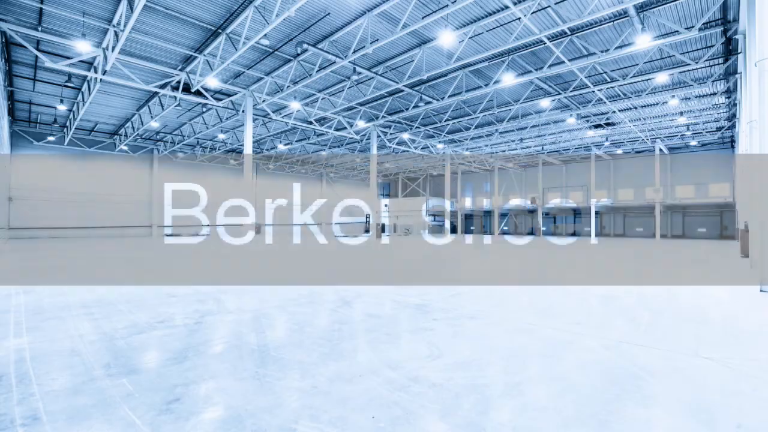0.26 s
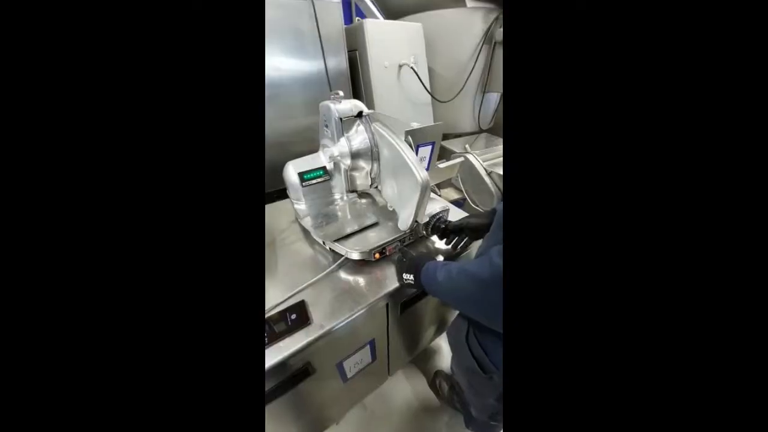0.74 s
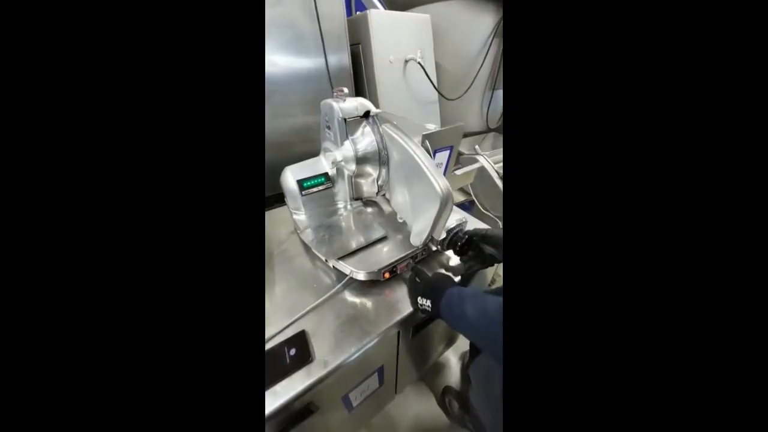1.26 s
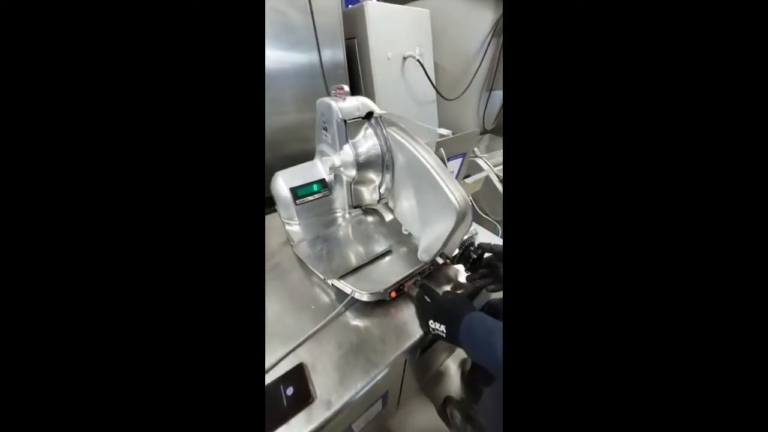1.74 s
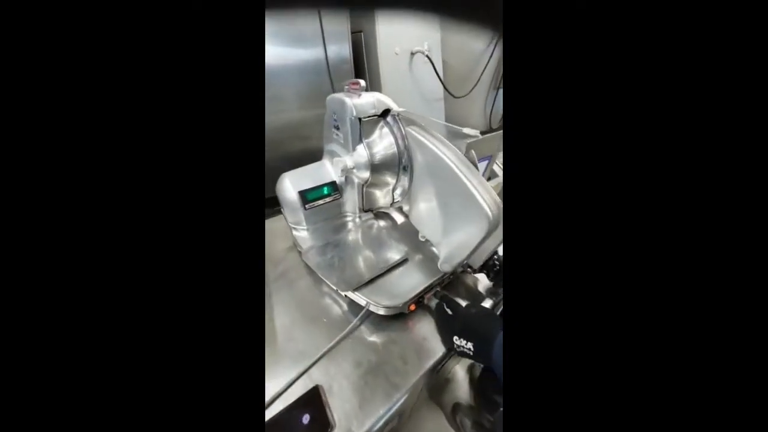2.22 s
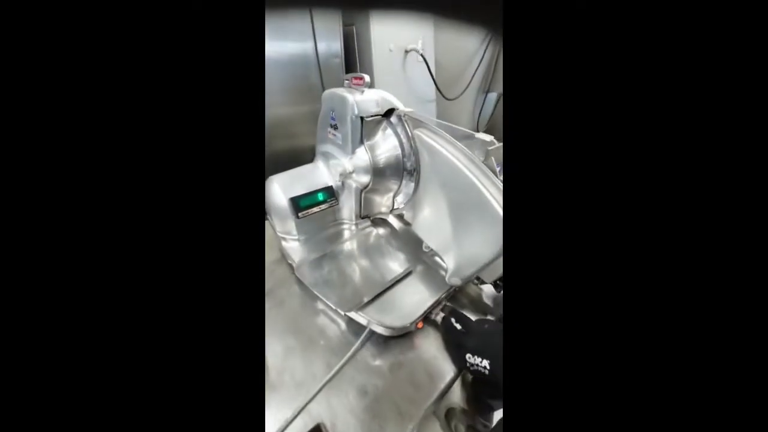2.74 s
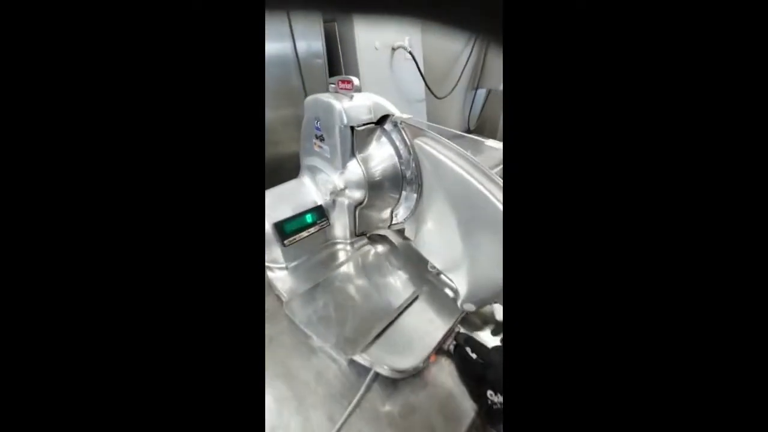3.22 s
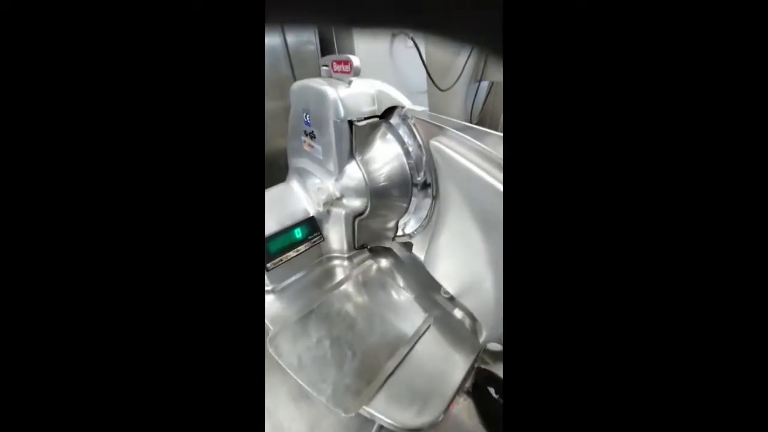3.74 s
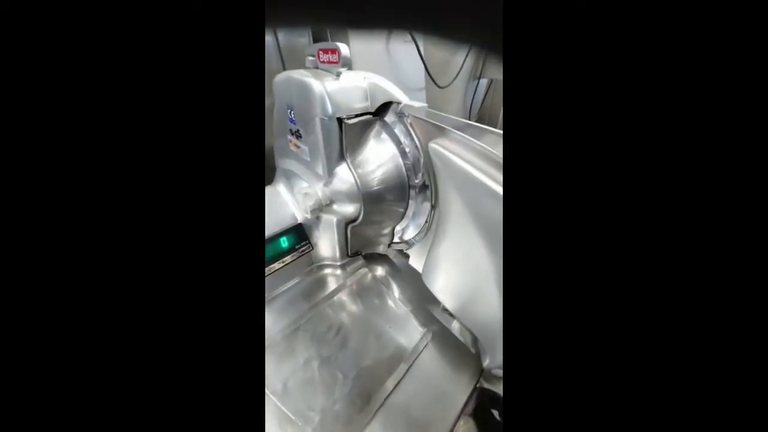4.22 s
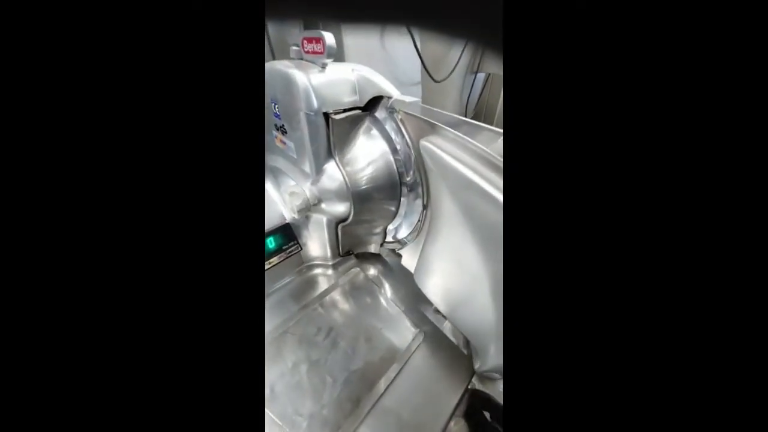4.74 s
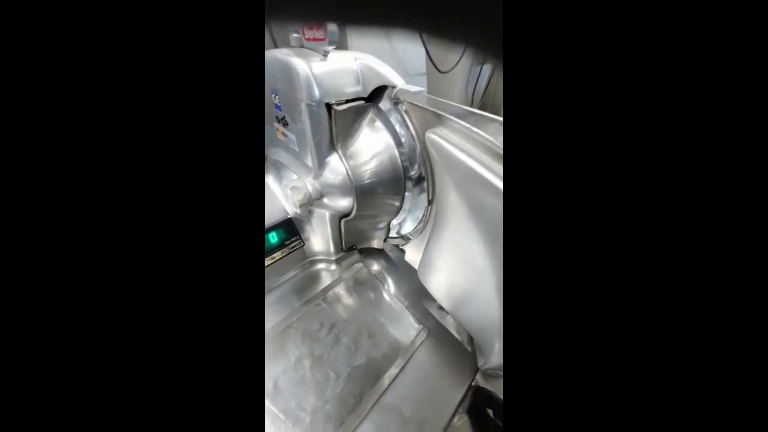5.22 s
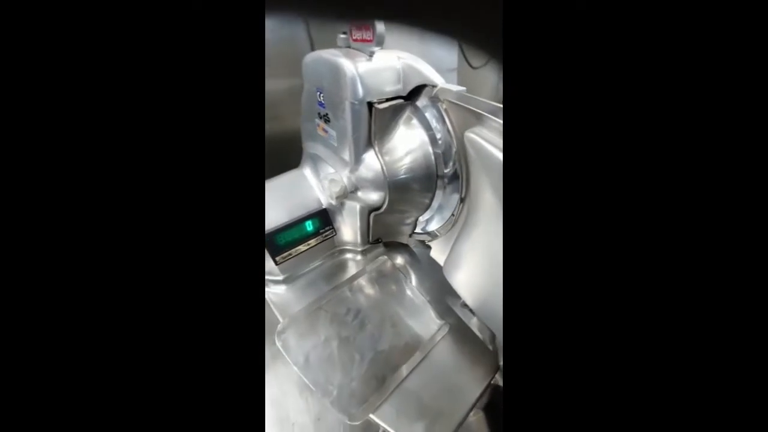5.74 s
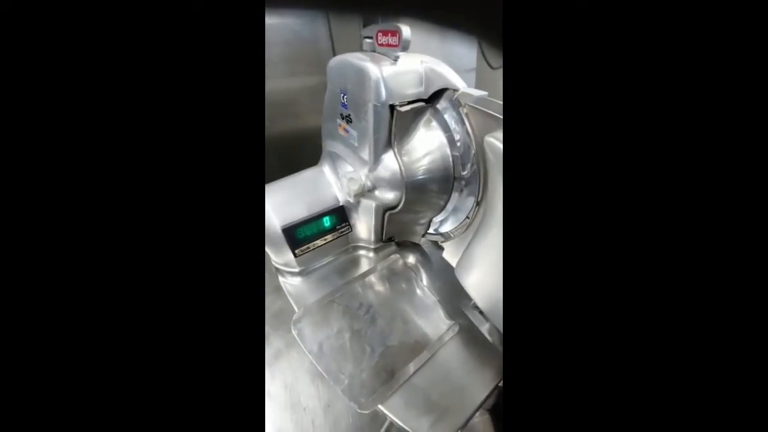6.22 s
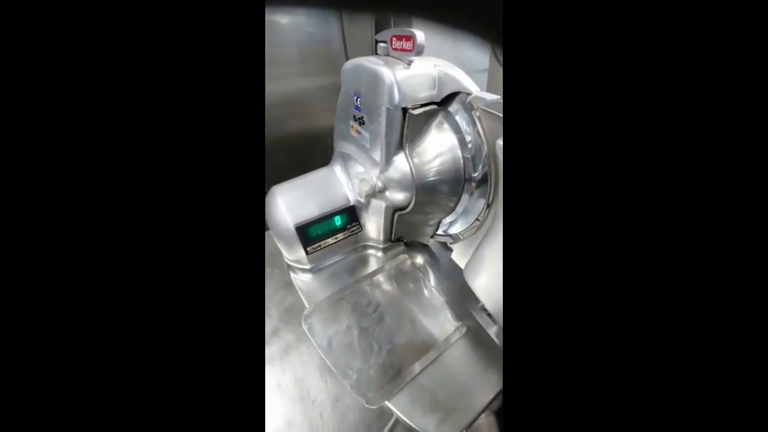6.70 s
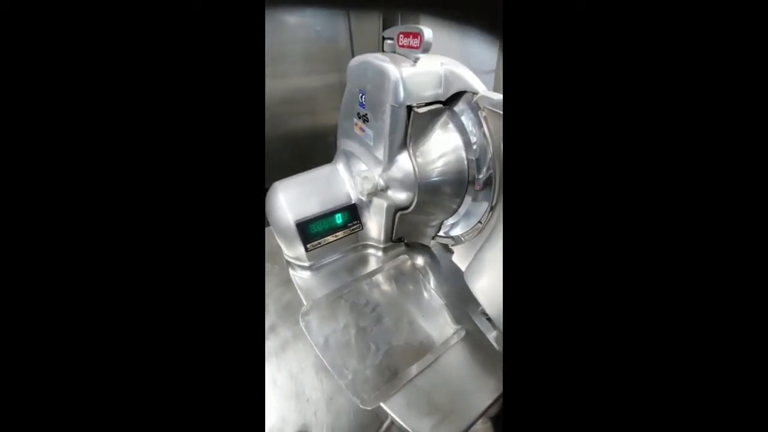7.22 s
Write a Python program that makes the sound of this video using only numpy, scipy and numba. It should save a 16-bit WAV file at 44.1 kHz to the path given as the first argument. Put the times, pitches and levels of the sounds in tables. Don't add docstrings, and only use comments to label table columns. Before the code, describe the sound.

A close electric slicer clicks on in a rumbling steel-lined room, its blade hissing against the guard with regular double knocks and wavering metal tones.

```python
import sys
import numpy as np
from numba import njit
from scipy import signal
from scipy.fft import rfft, irfft, next_fast_len
from scipy.io import wavfile
from scipy.ndimage import uniform_filter1d

SR = 44100
rng = np.random.default_rng(int(sys.argv[2]) if len(sys.argv) > 2 else 0)


def dump(signal):
    limited = np.clip(np.atleast_2d(signal).T, -1, 1)
    pcm = np.round(limited * 32767).astype(np.int16)
    wavfile.write(sys.argv[1], SR, pcm)


N = 329427
T = np.arange(N) / SR
SPIN_S, TURN_S, FIRST_KNOCK_S = 1.303, 0.30538, 1.329


def undb(db):
    return np.exp(np.asarray(db) * np.log(10) / 20)


def density(db):
    return undb(db) * np.sqrt(SR / 2)


def noise():
    return rng.standard_normal((2, N))


def over_time(points):
    return np.interp(T, *np.transpose(points))


def colour(x, points):
    size = next_fast_len(N)
    hz, db = np.transpose(points)
    bins = np.fft.rfftfreq(size, 1 / SR)
    gain = undb(np.interp(np.log(bins + 1), np.log(hz + 1), db))
    return irfft(rfft(x, size) * gain, size)[..., :N]


def bursts(times, db, rise, fall):
    out = np.zeros(N + SR)
    t = np.arange(SR // 4) / SR
    shape = (1 - np.exp(-t / rise)) ** 2 * np.exp(-t / fall)
    for s, gain in zip(times, undb(db)):
        first = int(s * SR)
        out[first:first + len(t)] += gain ** 2 * shape / shape.max()
    return out[:N]


@njit(fastmath=True)
def resonate(drive, pole, left, right, twin, wander, slip):
    out = np.zeros(drive.shape)
    for k in range(len(pole)):
        a, b = 0j, 0j
        for i in range(drive.shape[1]):
            j, u = i >> 11, (i & 2047) / 2048
            g = wander[k, j] + u * (wander[k, j + 1] - wander[k, j])
            turned = slip[k, j] + u * (slip[k, j + 1] - slip[k, j])
            a = a * pole[k] + drive[0, i]
            b = b * pole[k] + drive[1, i]
            out[0, i] += g * left[k] * a.imag
            out[1, i] += g * ((right[k] * turned * a).imag + twin[k] * b.imag)
    return out


def ring(drive, modes, alike, wander_db, slip_rad, narrow=0.36):
    hz, width, db, pan_db, lead = np.transpose(modes)
    radius = np.exp(-np.pi * narrow * width / SR)
    pole = radius * np.exp(2j * np.pi * hz / SR)
    gain = undb(db) * np.sqrt(2 * (1 - radius ** 2))
    chance = rng.standard_normal((2, len(hz), N // 2048 + 2))
    quick, slow = uniform_filter1d(chance[0], size=2), uniform_filter1d(chance[1], size=16)
    wander = undb(wander_db * (quick + 5.2 * slow))
    slip = np.exp(1j * slip_rad * np.cumsum(chance[1], axis=1))
    alike = np.clip(alike, 0, 1)
    left, right = gain * undb(pan_db / 2), gain * undb(-pan_db / 2)
    shared = right * np.sqrt(alike) * np.exp(-1j * lead)
    return resonate(drive, pole, left, shared, right * np.sqrt(1 - alike), wander, slip)


# f/Hz, level/dB per Hz
HALL_AIR = [(15, -36), (25, -41), (59, -1), (108, -6), (175, -28), (211, -5), (341, -11), (477, -23.5),
            (816, -17.5), (879, -24.5), (1100, -26.5), (1530, -29), (2100, -41.5), (2730, -83),
            (4620, -120)]
# t/s, level/dB
BED_SWELL = [(.61, -45.5), (.9, -44), (1.15, -42), (1.4, -41), (2.5, -40.5), (4.2, -39.5), (5.5, -40.5),
             (7.47, -40)]
# f/Hz, width/Hz, level/dB, left minus right/dB, left lead/rad
MOTOR_MODES = [(57.6, 11, -87, -6, .01), (89.6, 15, -53.5, -7, .01), (88, 39, -55, 5, .01),
               (146.7, 35, -51.5, 1.5, .01), (224.2, 45, -41.5, -6, .01), (296, 13, -50.5, -1, .01),
               (630, 400, -52.5, 5, 0.32), (859, 6.5, -55.5, 6, 0.91), (1682, 51, -56.5, 6, .3),
               (710, 9.2, -68, 5, 0.27), (1000, 6.8, -64.5, 10, .3)]
# t/s, level/dB
FAR_COMPRESSOR = [(.6, -38.5), (1.1, -47.5), (3.5, -57), (4.3, -56), (7.47, -63)]


def hall():
    swell = undb(over_time(BED_SWELL) + 38.0)
    mid, side = noise()
    side = colour(side, [(60, -29), (300, -17), (700, -10), (2000, 1.0)])
    air = colour(np.array([mid + side, 1.24 * (mid - side)]), HALL_AIR) * density(-58)
    running = np.interp(T, [.9, 1.4], [.45, 1])
    rough = ring(noise(), MOTOR_MODES, alike=.98, wander_db=1, slip_rad=0)
    mains_hz, mains_db = 99.4, -41.5
    mains = undb(mains_db + np.array([[-1.5], [1.5]])) * np.sqrt(2) * np.sin(2 * np.pi * mains_hz * T)
    hum = ring(noise(), [(53, 6, 0, -1.5, 0)], alike=1, wander_db=0, slip_rad=0)
    far = undb(over_time(FAR_COMPRESSOR)) * hum
    return swell * (air + running * (rough + running * mains)) + far


# t/s, level/dB, f/Hz (centre), decay/s
SWITCH_CLICKS = [
    (0.66, -54, 3900, .0006),
    (.876, -57, 900, .008),
    (.813, -60, 11000, .003),
    (.988, -66, 13000, .002),
    (1.09, -31, 11600, 0.0027),
    (1.084, -31.5, 6000, 0.0038),
    (1.07, -34, 2000, 0.014),
    (1.133, -51, 8200, .003),
    (1.133, -50, 3500, 0.015),
    (1.09, -58, 2900, .04),
]


def switch():
    out = np.zeros((2, N))
    for s, db, hz, decay in SWITCH_CLICKS:
        click = np.sqrt(bursts([s], [db], 0.00035, decay / 2)) * noise()
        out += colour(click, [(hz / 3, -14), (hz / 1.33, -3), (hz, 3), (hz * 1.2, -3), (hz * 3, -14)])
    return out


# first knock level/dB, second knock level/dB, housing thud level/dB
BLADE_TURNS = [(-51.5, -30.5, -42), (-35, -27.5, -22), (-30.5, -24.5, -47), (-24, -30, -23),
               (-26, -25, -49), (-26, -29, -51), (-26.5, -29, -40), (-32.5, -28, -34), (-29.5, -30, -39),
               (-27, -31.5, -26), (-28, -29.5, -40), (-33, -28.5, -28), (-27.5, -22.5, -20),
               (-67, -31.5, -37), (-54, -29.5, -30), (-41, -30, -41), (-34, -29.5, -24),
               (-30, -30.5, -20.5), (-29, -31.5, -23), (-31, -33, -20), (-28, -28, -17)]


def turns():
    return FIRST_KNOCK_S + TURN_S * np.arange(len(BLADE_TURNS))


# t/s, thud level/dB, tick level/dB, thud f/Hz, length/s
STRAY_CONTACTS = [(1.15, -42.5, -95, 296, 0.072), (1.223, -51.5, -92, 385, 0.045),
                  (1.351, -36.5, -38, 382, 0.03), (4.427, -38.5, -58, 221, 0.035),
                  (6.736, -34.5, -58, 242, 0.029), (2.057, -42, -31, 650, 0.015),
                  (3.279, -39, -33, 680, 0.017), (3.35, -47, -41, 700, 0.0099),
                  (4.141, -31, -46, 460, 0.016), (5.046, -29, -16, 642, 0.012),
                  (5.085, -53, -24, 690, 0.021), (5.093, -55, -11, 690, 0.0041),
                  (5.18, -54, -28, 690, .006), (5.32, -52, -15, 700, 0.0054), (5.18, -48, -21, 684, 0.019),
                  (5.952, -35.5, -20, 700, 0.011), (6.064, -47.5, -28, 686, 0.06),
                  (4.152, -28.5, -48, 750, 0.0084)]
# f/Hz, width/Hz, level/dB, left minus right/dB, left lead/rad
HOUSING_MODES = [
    (670, 75, -3, 3.5, .3),
    (780, 70, -10, 2.5, .3),
    (560, 80, -14, 1.5, .2),
]


def housing():
    turn, thud_db = turns(), np.transpose(BLADE_TURNS)[2]
    blows = np.zeros(N + SR)
    for delay, db in [(.001, -6), (.014, -56), (.019, -7), (.075, -13)]:
        blows[((turn + delay) * SR).astype(int)] += undb(thud_db + db)
    push = np.convolve(blows, np.hanning(30) / 15)[:N]
    rattle = np.sqrt(bursts(turn + 0.0149, thud_db - 26.5, 0.00024, 0.0052)) * noise()
    out = undb(22) * ring(push + rattle, HOUSING_MODES, alike=1.0, wander_db=.6, slip_rad=0.05)
    grit = noise()
    for at, db, _, hz, length in STRAY_CONTACTS:
        shove = np.sqrt(bursts([at], [db], 0.11 * length, 0.5 * length)) * grit
        mode = (hz, 70 + 1.2 / length, 3, 2.5, .3)
        out += ring(shove, [mode], alike=.85, wander_db=0, slip_rad=0)
    return out


# t/s, rubbing level/dB, dryness/dB, unevenness round the rim (0-1)
RIM_RUB = [(1.5, -34, 9.5, 1.1), (2.15, -33, 3.5, 1.1), (2.45, -34, 6, 1.1), (2.8, -33.5, 5.5, 1.2),
           (3.35, -33.5, 5, 1), (3.7, -32, 2.5, 0.75), (4.36, -32.5, 3.5, 0.06), (4.8, -32.5, 2, 0.95),
           (5.14, -34, 12, 0), (5.4, -33.5, 8, 0.1), (5.77, -32.5, 8.5, 1.4), (6.1, -36.5, 7, 0),
           (6.59, -36.5, 5.5, 0), (7.47, -35.5, 3.5, 0)]
# share of a turn, level/dB
RIM_SHAPE = [(0, 6.5), (.13, -6), (.2, 6.5), (.28, 0.5), (.45, -3), (.56, -1.5), (.62, -1), (.75, 2),
             (.9, -0.5), (1, -1)]


def contact(knock_db, scrape_db, scrape_s):
    s, *columns = np.transpose(RIM_RUB)
    mid_db, dry_db, uneven = (np.interp(T, s, c) for c in columns)
    low_db, high_db = mid_db - 4.5 - 0.73 * dry_db, mid_db + dry_db
    turn, (first_db, second_db, _) = turns(), np.transpose(BLADE_TURNS)
    tick_db = -20 + 0.76 * (np.maximum(first_db, second_db) + 33.5)
    graze_db = -27 - 0.54 * (turn - turn[0]) - 9 * (turn > 5.45)
    rim_db = np.clip(uneven, 0, 1) * np.interp((T - turn[0]) / TURN_S % 1, *np.transpose(RIM_SHAPE))

    knock = bursts(turn, first_db - .5, 0.00085, 0.0019) + bursts(turn + 0.013, second_db, 0.0027, 0.0061)
    bright = bursts(turn, tick_db - 9.0, 0.00099, 0.00097) + bursts(turn + 0.017, tick_db, 0.0011, 0.0031)
    scrape = bursts(turn + 0.1783, graze_db + scrape_db, 0.0038, scrape_s)
    for at, thud_db, stray_db, _, length in STRAY_CONTACTS:
        knock = knock + bursts([at], [(thud_db + stray_db) / 2 - 1], 0.25 * length, 0.96 * length)
        bright = bright + bursts([at], [stray_db], 0.061 * length, 0.87 * length)
    knock, bright = knock * undb(2 * knock_db), bright * undb(2 * knock_db)

    slow_start, spin_up = np.clip((T - SPIN_S) / 0.031, 0, 1) ** 2, np.clip((T - SPIN_S) / 0.0072, 0, 1)
    low = slow_start * undb(2 * (low_db + rim_db)) + knock + undb(-23.0) * scrape
    mid = spin_up * undb(2 * (mid_db + rim_db)) + undb(-9.5) * bright + undb(-3) * scrape + knock
    high = spin_up * undb(2 * (high_db + 0.66 * rim_db)) + undb(-4.0) * bright + undb(7.5) * scrape
    grit = noise() * undb(2.33 * rng.exponential(size=N) - 3.5)
    bands = [(low, -39, [(2500, 0), (3300, -40)]),
             (mid, -33, [(2300, -40), (2950, 0), (8500, 0), (10000, -30)]),
             (high, -32, [(7800, -30), (9300, 0)])]
    return sum(np.sqrt(power) / undb(usual_db) * colour(grit, edges) for power, usual_db, edges in bands)


# f/Hz, level/dB per Hz
RIM_HISS = [(300, -24), (450, -19), (700, 5.5), (1000, -6), (1500, -9), (2100, 1), (3000, 3.5), (3400, -2),
            (4400, 6), (6100, -5), (7400, 3), (8600, -3), (11500, -6.5), (15500, -17.5)]
# f/Hz, left minus right/dB
RIM_HISS_PAN = [(60, -2.5), (110, -2.5), (200, -34), (380, -37.5), (700, 0.5), (1290, -11), (2380, 1.5),
                (4400, 3), (8120, 10.5), (15000, -19.5)]
# f/Hz, level/dB, left minus right/dB
PANEL_MODES = [(470, -55, 1), (669, -50, 6.5), (777, -48.5, 2), (1245, -52, -2), (1464, -52.5, .7),
               (1605, -55, 1), (1911, -50, 4), (1971, -50.5, 6.5), (2542, -49, .6), (2780, -48.5, 2),
               (2840, -50.5, 2), (2976, -53, 2), (3230, -52, -3), (3371, -50, 1.3),
               (4171, -47.5, -4), (4282, -52, -2), (4438, -48, 0), (4701, -51, -1.4), (4878, -51, -3),
                  (5107, -48.5, .4), (5324, -48.5, -1), (5729, -52, 4.4), (6173, -54, 5), (6384, -52, 2.5),
                  (6772, -51, 4.6), (6867, -50, 2), (7089, -51.5, .6), (7712, -50, 4.5)]


def panels(count):
    place, size, side, lead = rng.random((count, 4)).T
    hz = 450 + 15200 * (np.arange(count) + place) / count

    def at(points):
        point_hz, level = np.transpose(points)
        return np.interp(np.log(hz), np.log(point_hz), level)

    db = at(RIM_HISS) - 53 + 6 * (size - .5) - 9 * (hz < 8800)
    pan_db = at(RIM_HISS_PAN) + 0.74 * (side - .5)
    free = np.ones(count, bool)
    for own_hz, own_db, own_pan_db in PANEL_MODES:
        k = np.argmin(abs(hz - own_hz) + SR * ~free)
        free[k], hz[k], db[k], pan_db[k] = False, own_hz, own_db - 0.95, own_pan_db
    width = 28 + hz / 350 + 60 * (hz < 900)
    lead_rad = 2 * np.pi * lead * np.clip((hz - 450) / 2500, 0, 1)
    return np.transpose([hz, width, db, pan_db, lead_rad])


# f/Hz, width/Hz, level/dB, left minus right/dB,
# left lead/rad
BLADE_MODES = [(1130, 11, -50.1, -1.2, 0.8), (1174, 10, -54.5, 2.4, 2.1), (1270, 3, -47.0, -3.5, 0.4),
               (1297, 43, -46.5, -2.5, 0.2), (1663, 12, -48.7, 2.2, 0.8), (1707, 13, -47.8, 1.8, 1.9),
               (2288, 9, -48.7, 2.2, -0.3), (2334, 9, -47, -7.7, -0.5), (2369, 15, -50.5, -1.3, 0.1),
               (3058, 19, -45, -2.0, -0.9), (3095, 26, -47.8, 0.4, -0.8), (3650, 18, -50.4, 0.2, 0.9),
               (3698, 12, -47.8, 1.0, 1.0), (3763, 16, -43, -6.2, -1.5)]
GUARD_MODES = [(4517, 9, -48.5, -1.8, -2.5), (5109, 18, -48.6, 0.3, -3.1), (5324, 23, -51.0, -1.3, 2.4),
               (5728, 22, -52.8, 4.5, -0.3), (6385, 19, -53.2, 2.4, 0.2), (6535, 22, -49.7, 3.3, 0.5),
               (6869, 29, -50.0, 1.8, -2.8), (7241, 19, -52.1, 2.4, 0.4), (7332, 22, -50.0, -1.1, 2.0),
               (7704, 42, -50.7, 4.8, -0.2)]
COVER_MODES = [(9959, 43, -48.2, 1.3, -2.3), (10131, 46, -48.2, 2.8, -3.1), (10357, 23, -48.7, -2.0, 3.1),
               (10503, 29, -50.8, -2.7, 1.4), (10826, 20, -47.8, -4.1, 2.8), (10923, 18, -50.2, -2.6, 2.8),
               (11047, 27, -46.4, -5.3, 2.4), (11235, 24, -47, -5.3, -2.2), (11418, 28, -44.2, -4.1, 2.0),
               (11666, 31, -49.4, -5.6, -2.3), (11900, 40, -49, -5, 1.0), (12015, 25, -46, -6, -1.0),
               (12425, 29, -45.3, -8.5, -0.7), (12662, 20, -44.7, -8.5, 0.5), (12845, 43, -45, -6.2, 1.7),
               (13211, 24, -49.5, -8.6, 0.5), (13361, 31, -48.4, -5.6, 0.8), (13410, 20, -48.2, -1.8, 2.5),
               (13663, 36, -48.4, -6.5, 0.0), (13884, 24, -50.5, -5.1, -0.3), (14217, 20, -50.1, -2.6, 0.7),
               (14400, 47, -47.6, -7.0, 0.8), (14793, 30, -48.4, -4.5, -1.5),
               (14998, 40, -48.3, -4.4, -0.7), (15525, 18, -54, -4.1, 2.0), (15569, 51, -48.6, -2.4, 0.5)]


def blade():
    shake = contact(knock_db=-2.5, scrape_db=3.5, scrape_s=0.0038)
    sing = contact(knock_db=-4.0, scrape_db=7.0, scrape_s=0.015)
    hiss = np.array([np.roll(shake[0], shift=16), 0.75 * shake[0] + 1.29 * shake[1]])
    hiss = colour(hiss, RIM_HISS) * density(-76.0)
    pan = np.array(RIM_HISS_PAN)
    hiss = np.array([colour(hiss[0], pan * [1, .5]), colour(hiss[1], pan * [1, -.5])])
    steel = ring(sing, BLADE_MODES + GUARD_MODES, alike=0.75, wander_db=1.3, slip_rad=0.13, narrow=0.63)
    cover = ring(shake, COVER_MODES, alike=.8, wander_db=1.7, slip_rad=0.63, narrow=0.81)
    trays = ring(shake, panels(count=150), alike=1.0, wander_db=2.0, slip_rad=0.33)
    return hiss + undb(-4.5) * steel + undb(-3) * cover + trays


# f/Hz, level/dB
SUNG_MODES = [(867, -62), (1131, -59), (1297, -60), (1666, -53.5), (1709, -57), (2288, -58),
              (2333.5, -43.5), (3057, -56), (3700, -54), (3761, -51), (4517, -57)]
# t/s, length/s, f/Hz, level/dB
RIM_LOCKS = [(1.66, 0.11, 1297, -45), (1.935, 0.2, 1297, -41.5), (4.88, .3, 2333, -55),
             (5.958, .15, 1297, -48), (7.14, 0.19, 1666, -46.5), (1.356, 0.27, 1666, -48),
             (1.353, 0.32, 1709, -40), (1.814, 0.14, 3058, -32), (1.84, .17, 1707, -42),
             (2.09, 0.074, 3761, -32), (2.102, 0.26, 1666, -41), (2.108, 0.19, 3058, -31.5),
             (2.227, .12, 1297, -48), (2.234, 0.5, 1131, -39.5), (2.4, 0.19, 3761, -34),
             (2.422, 0.15, 3058, -35), (2.484, 0.16, 2333, -38), (2.53, 0.091, 1297, -33),
             (2.71, 0.19, 3761, -32.5), (2.691, 0.31, 3056, -33.5), (2.827, 0.2, 1131, -43),
             (3.028, 0.11, 3056, -30.5), (3.062, 0.1, 2333, -44), (3.04, .06, 4517, -46),
             (3.154, 0.15, 1297, -38.5), (3.335, 0.17, 2288, -37), (3.45, 0.11, 1297, -38),
             (3.657, 0.47, 3761, -49), (3.766, 0.18, 2333, -43), (4.035, 0.15, 2333, -38),
             (4.266, 0.2, 3761, -30), (4.538, .12, 3761, -33), (4.602, 0.1, 2288, -33.5),
             (4.8, 0.31, 3761, -43), (4.967, 0.1, 2333, -45), (5.05, 0.25, 3761, -33.5),
             (5.075, 0.18, 3700, -39), (5.185, 0.16, 2333, -42), (5.506, 0.37, 3761, -39.5),
             (5.904, 0.16, 3761, -32.5), (6.05, 0.23, 3761, -55), (6.604, 0.36, 3761, -48),
             (6.62, 0.16, 2333, -54), (4.254, 0.57, 2333, -77), (4.75, 0.17, 2333, -64),
             (5.95, 0.091, 2333, -67), (6.25, 0.08, 2333, -64), (6.89, 0.25, 2333, -64),
             (7.202, 0.19, 2333, -75), (6.28, 0.18, 3761, -57), (3.5, 0.27, 2333, -66),
             (6.88, 0.22, 3761, -46), (7.224, 0.29, 3761, -47)]


def song():
    rub_db = np.interp(T, *np.transpose(RIM_RUB)[:2])
    force = undb(rub_db + 33) * np.clip((T - SPIN_S) / 0.051, 0, 1)
    knots, out = np.arange(0, T[-1] + .1, .05), 0
    sung_hz = np.array(SUNG_MODES)[:, 0]
    sides = np.array([[.5], [-.5]])
    for k, (hz, db) in enumerate(SUNG_MODES):
        walks = rng.standard_normal((4, len(knots))).cumsum(axis=1)
        drift, left, right, swell = (np.interp(T, knots, c) for c in walks)
        size = force * undb(db + 0.5)
        pan_db, lead = min(BLADE_MODES + GUARD_MODES, key=lambda mode: abs(mode[0] - hz))[3:]
        for at, length, locked_hz, locked_db in RIM_LOCKS:
            if np.argmin(abs(sung_hz - locked_hz)) == k:
                span = slice(int(at * SR), int((at + 2 * length) * SR))
                age = T[span] - at
                hold = np.clip(age / .02, 0, 1) * np.exp(-(age / length) ** 4 - .5 * age / length)
                tremble = undb(3.5 * np.sin(hz + 2 * np.pi * 23 * age + 2 * swell[span]))
                size[span] += undb(locked_db - 1.5) * hold * tremble
        flutter = undb(1.8 * np.sin(.3 * swell + np.array([[0], [1.5]])))
        phase = 2 * np.pi * hz * T + 0.45 * drift + 0.1 * np.array([left, right]) + lead * sides
        out = out + np.sqrt(2) * size * flutter * np.sin(phase) * undb(.6 * pan_db * sides)
    return out


# f/Hz, width/Hz
ECHO_NOTCHES = [(1020, 70), (2130, 80), (2470, 40), (2700, 60), (2930, 50), (3300, 80), (3450, 80),
                (3920, 80), (4280, 110), (4620, 50), (4950, 140), (5450, 110), (6000, 100), (6650, 130),
                (7400, 150), (8650, 90), (9700, 200), (10700, 300), (11700, 150), (13600, 400),
                (15100, 150)]
# phone low level/dB, close level/dB, drawn back level/dB
NOTCH_DEPTHS = [(-3, -4, 1), (-0.5, -7, -9), (1, -1, -5), (9, -1, 12), (-1, 1.5, -7.5), (-9, -8.5, -9),
                (-1, 3.5, 0), (0, -2, -3), (2.5, -0.5, -8), (12.5, 1, -3), (-3, -2.5, 4), (3, -4.5, -1),
                (3, -3, -2), (-2, -2, 5), (-1.5, 0, 1.5), (-4, -7, 2.5), (-9, -2.5, -2.5), (-3.5, -2.5, -5),
                (-3, -4, -1), (-7, -2, 0.5), (-7, 2, 1)]
PHONE_MOVES = [
    2.2,
    3.4,
    4.9,
    6.0,
]


def table(x):
    hz = np.arange(100, 16000, 20.)
    shapes = np.array([np.exp(-.5 * ((hz - at) / width) ** 2) for at, width in ECHO_NOTCHES])
    bass_loss_db = 18 * np.log2(np.clip(420 / hz, 1, 8))
    place = np.interp(T, PHONE_MOVES, [0, 1, 1, 2])
    out = 0
    for k, db in enumerate(np.clip(NOTCH_DEPTHS, -20, 4).T @ shapes):
        nearness = np.clip(1 - abs(place - k), 0, 1)
        out = out + nearness * colour(x, np.transpose([hz, db - bass_loss_db]))
    return out


# f/Hz, level/dB
GUARD_CRACK = [(500, -3), (1100, -2), (2300, 11), (3400, 5.5), (5000, 7.5), (8000, -24)]
# f/Hz, width/Hz, level/dB, left minus right/dB, left lead/rad
KNOCKED_MODES = [(1131, 40, -3, -1, .8), (1297, 45, -1, -2.5, .2), (1600, 70, -4, 2, 1.0),
                 (1900, 60, -9, 1, .5), (2290, 50, -2, -3, -.4), (3400, 70, -4, 1, .9),
                 (4230, 60, -2, -2, -1.5), (5110, 60, -6, .3, -3.0)]


def clack():
    turn, (first_db, second_db, _) = turns(), np.transpose(BLADE_TURNS)
    first = bursts(turn - .002, first_db - 0.5, 0.0021, 0.0039)
    second = bursts(turn + 0.018, second_db, 0.0025, 0.0044)
    mid, side = noise() * np.sqrt(first + second)
    rung = ring(np.array([mid, side]), KNOCKED_MODES, alike=.8, wander_db=1.0, slip_rad=.2, narrow=1.0)
    crack = colour(np.array([mid + .5 * side, mid - .5 * side]), GUARD_CRACK)
    return undb(-0.5) * crack + undb(np.interp(T, PHONE_MOVES, [-6.0, -1.5, -5.0, -7.5])) * rung


def scene():
    return table(blade() + song()) + housing() + hall() + switch() + clack()


# f/Hz, level/dB per Hz
MIC_NOISE = [(1180, -30), (2000, -4), (2820, -11), (3530, -13), (4310, -2), (6300, -10.5), (11700, -10.5),
             (15700, -11)]


def microphones():
    return colour(noise(), MIC_NOISE) * density(-103)


def roll_off(x):
    return signal.sosfilt(signal.butter(12, 16200, fs=SR, output="sos"), x)


def record(dry):
    heard = (dry + microphones()) * (T > .6096)
    low_pass = signal.ellip(10, .2, 60, 15680, fs=SR, output="sos")
    high_pass = signal.butter(3, 42, "high", fs=SR, output="sos")
    mix = signal.sosfilt(high_pass, signal.sosfilt(low_pass, heard))
    return roll_off(mix)


dry = scene()
out = record(dry)
dump(out)
```